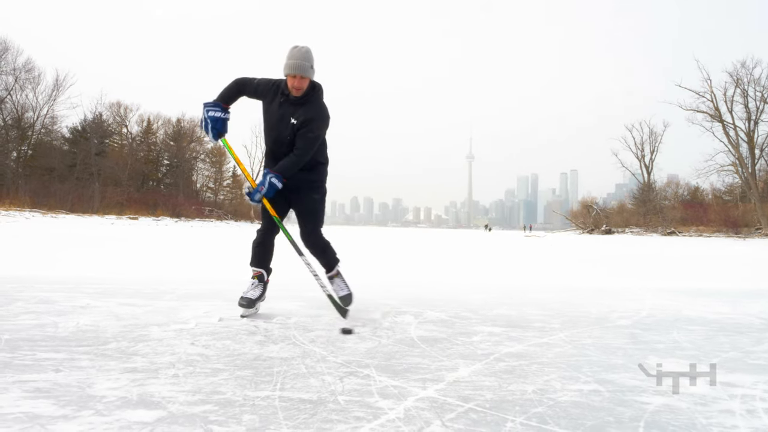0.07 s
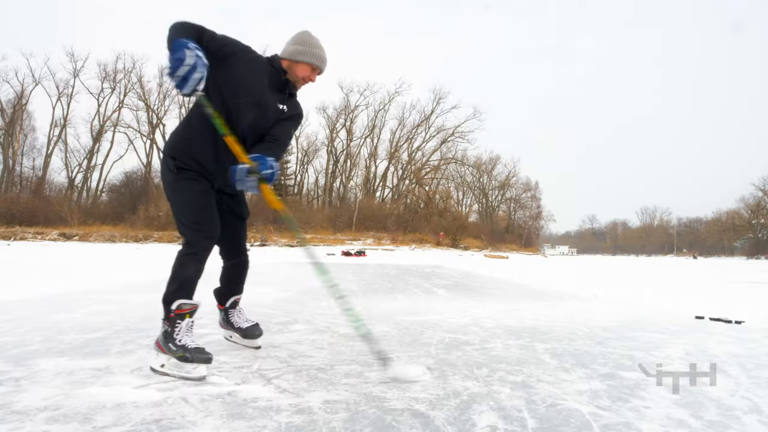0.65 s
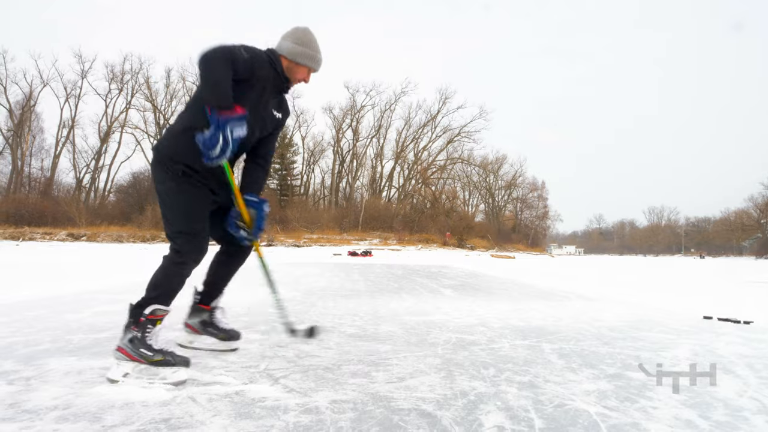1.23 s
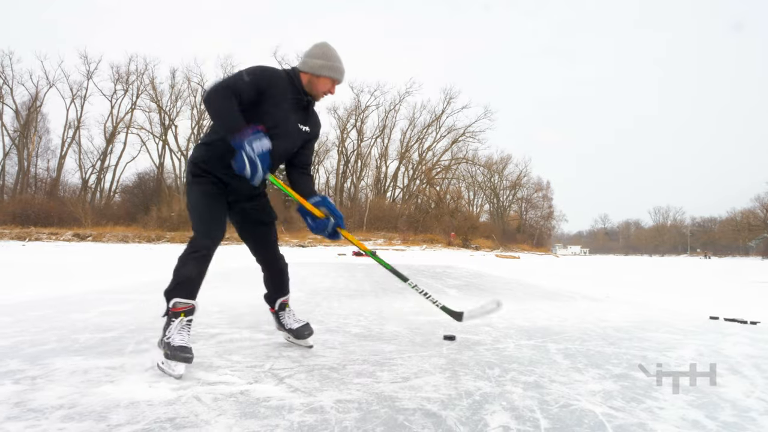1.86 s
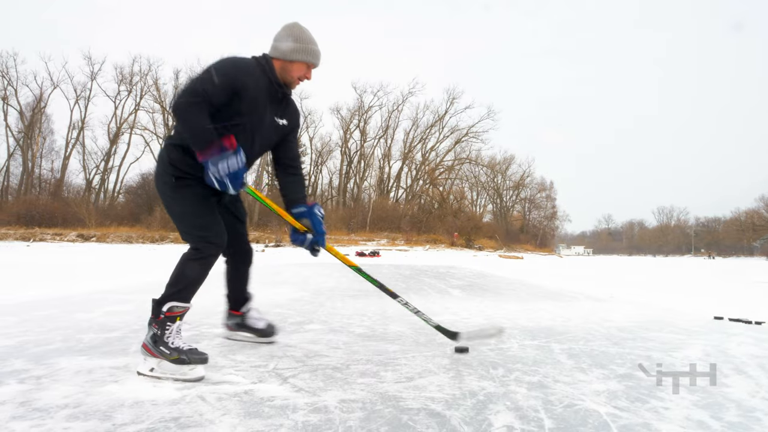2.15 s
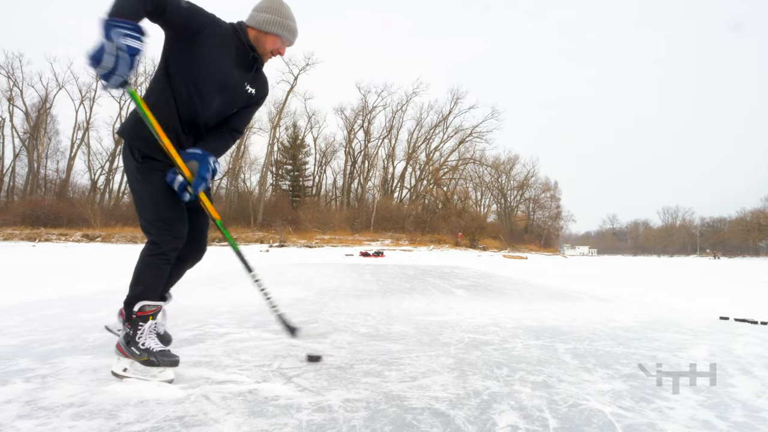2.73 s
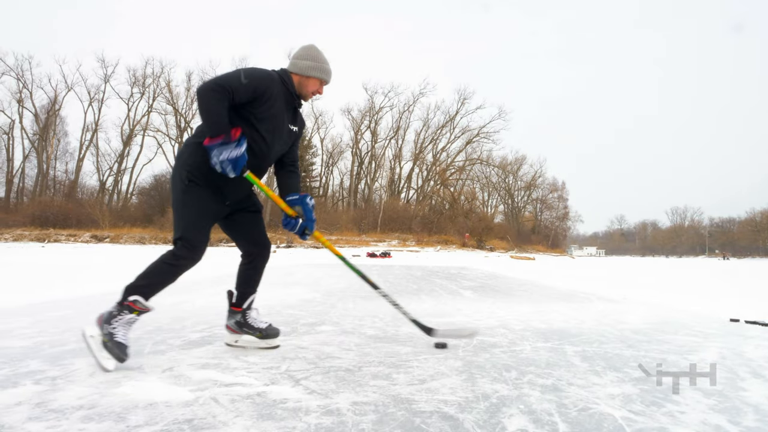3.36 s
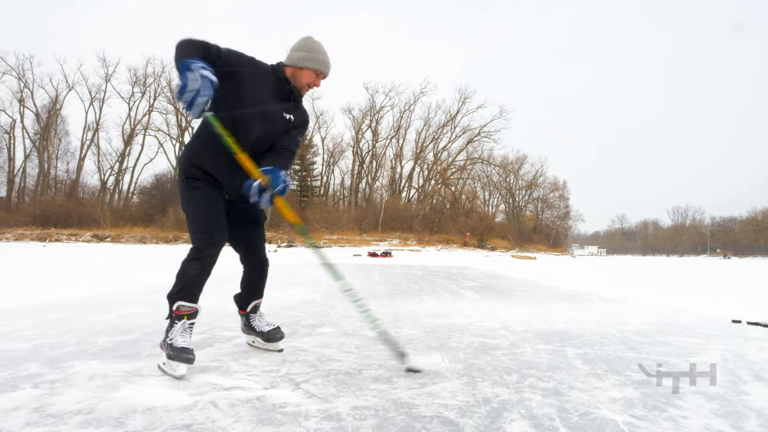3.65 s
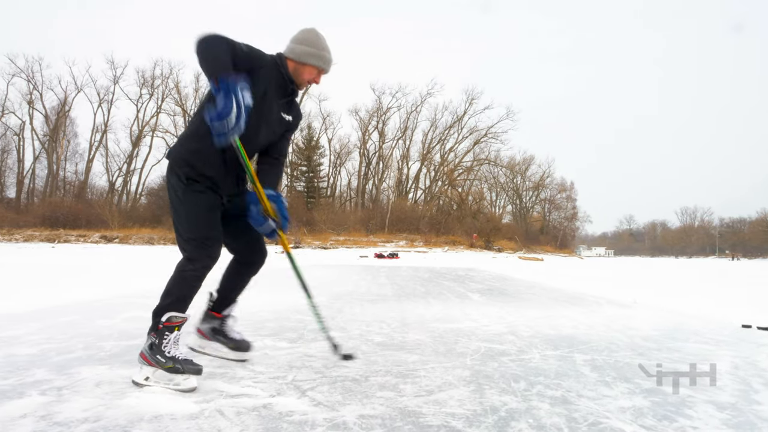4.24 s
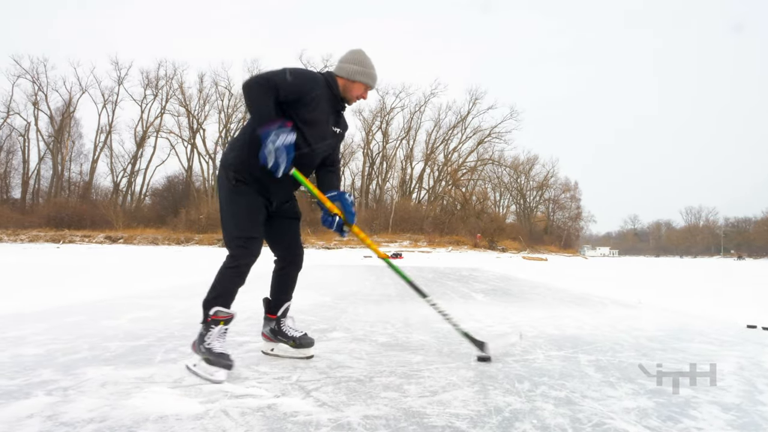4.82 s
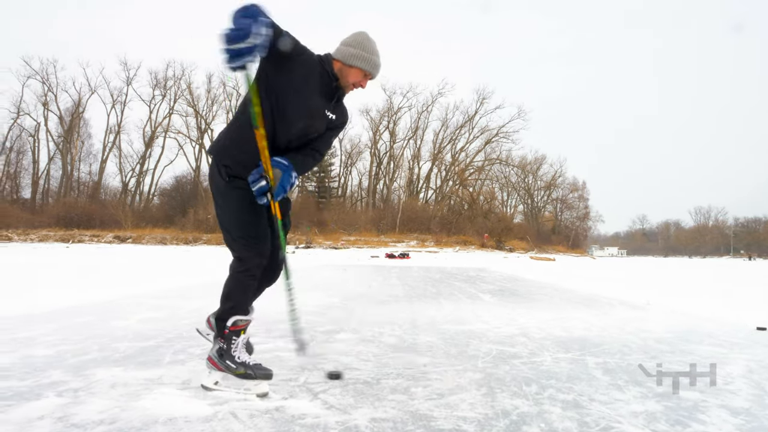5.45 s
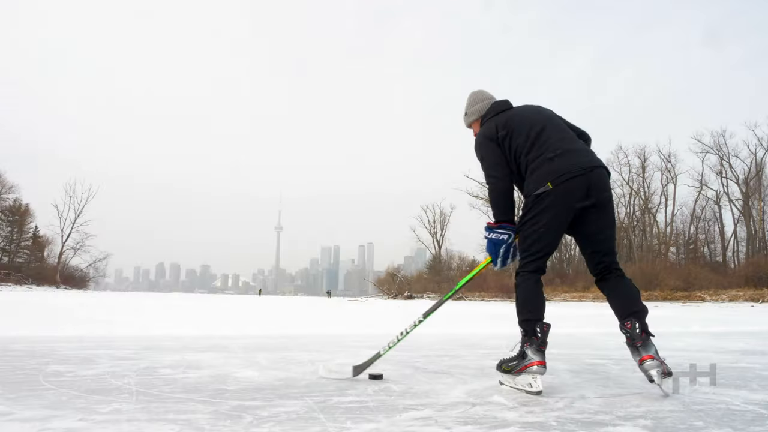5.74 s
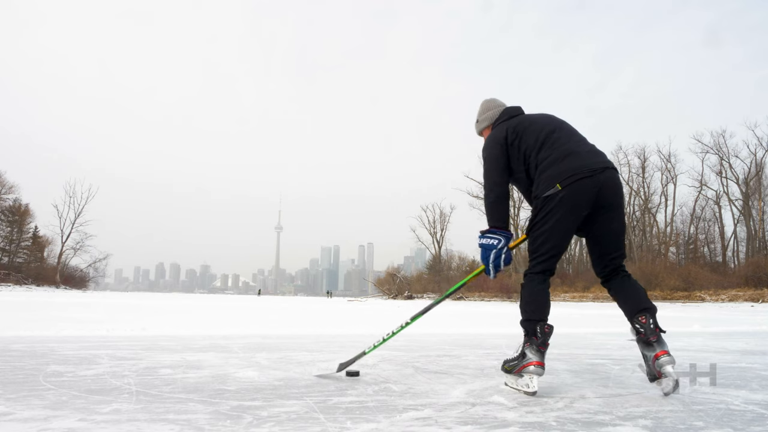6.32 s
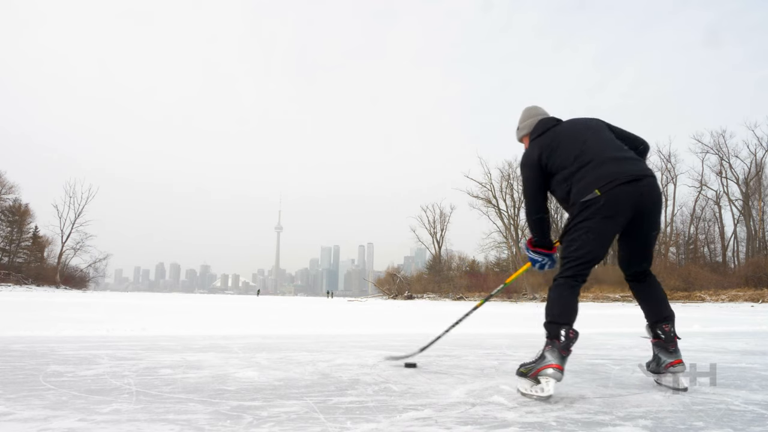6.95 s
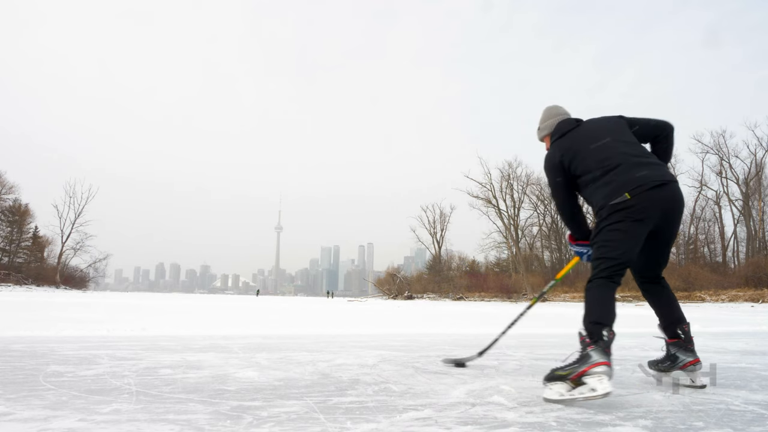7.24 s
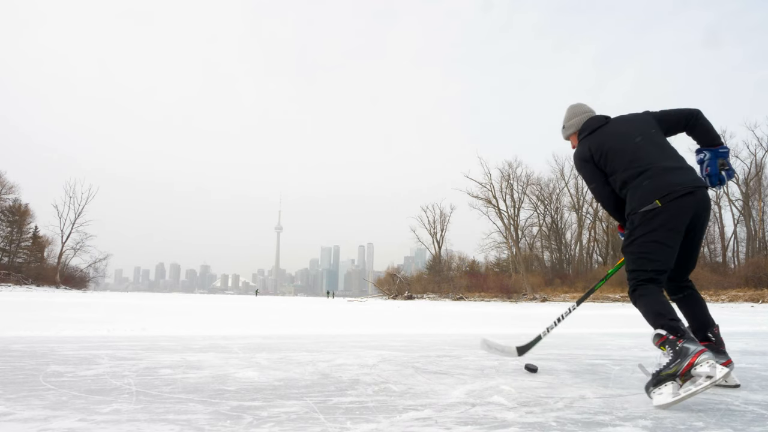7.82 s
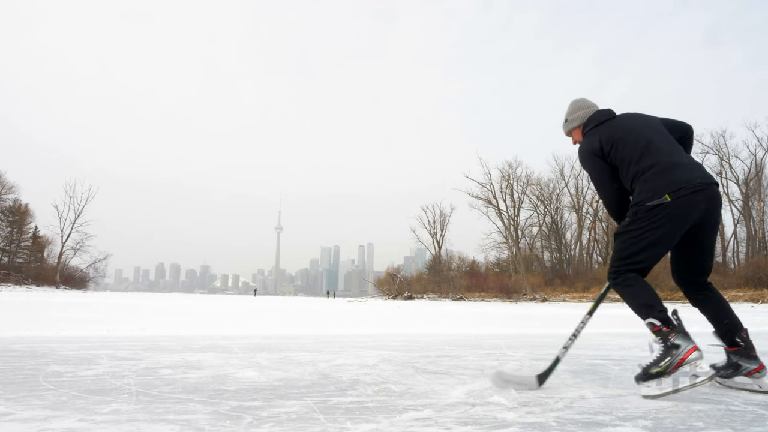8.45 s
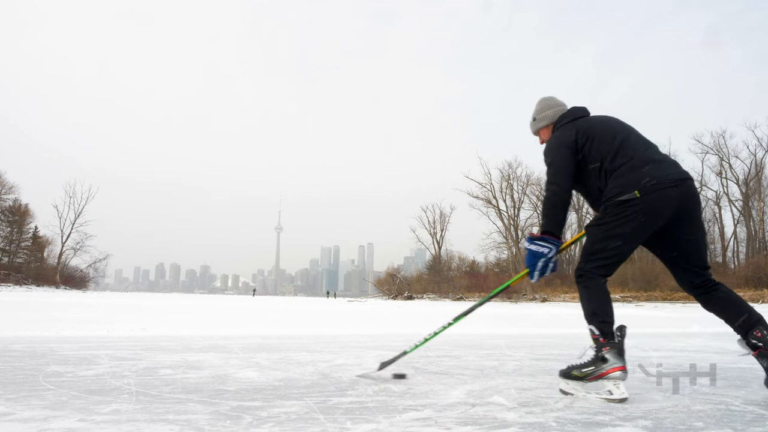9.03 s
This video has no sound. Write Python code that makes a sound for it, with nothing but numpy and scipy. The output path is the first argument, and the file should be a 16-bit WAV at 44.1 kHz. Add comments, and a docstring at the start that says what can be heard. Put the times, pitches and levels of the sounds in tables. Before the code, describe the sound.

From the start, a hockey stick dribbles a puck on outdoor ice, very close. Its blade sweeps back and forth in gritty, hissing scrapes, broken by sharp, uneven clacks a few times a second, over the low, lumpy rumble of gliding skates. Coarse ice crackles around 1 and 4 seconds. The hardest taps slightly overload the microphone and briefly duck the level. After a last tap near 5.7 seconds, the sound falls to a faint glide and quiet open air. At about 6.4 seconds the puck drags across the ice, ending in a knock at 6.6. From 7 seconds the skates carve a slow, duller turn in swelling scrapes. Puck and blades knock, strongest around 7.1, 7.7 and 8.5 seconds, with soft low thumps from the ice sheet. A slightly more muffled scrape builds to a final knock at 9 seconds.

```python
"""On outdoor ice, very close, a skater dribbles a puck over the rumble of the skates.
Friction breaks the ice in tiny fractures, which excite the resonances of the stick's blade as it
sweeps forehand and backhand; its taps on the puck are impulses that ring the same resonances.
Later the skates carve a slow, duller turn, with knocks of puck and runners and booms of the ice sheet.
The hardest hits overload the microphone and duck its gain."""
import sys
import numpy as np
from scipy import signal
from scipy.fft import rfft, irfft
from scipy.io import wavfile
from scipy.ndimage import uniform_filter1d

SR = 44100
rng = np.random.default_rng(int(sys.argv[2]) if len(sys.argv) > 2 else 0)


def pcm_store(signal):
    """Save signal as 16-bit PCM."""
    levels = np.round(np.clip(np.atleast_2d(signal), -1, 1) * 32767)
    wavfile.write(sys.argv[1], SR, levels.astype(np.int16).T)


N = 400428
TIME = np.arange(N) / SR
FREQ_HZ = np.fft.rfftfreq(N, 1 / SR)


def amp(db):
    """Amplitude ratio of a level in decibels."""
    return 10 ** (np.asarray(db) / 20)


def unit_rms(x):
    """Normalisation to unit power."""
    return x / np.sqrt(np.mean(x ** 2) + 1e-20)


def add(mix, start_s, sound):
    """Superposition of a sound on the mix, in place."""
    part = mix[round(start_s * SR):][:len(sound)]
    part += sound[:len(part)]


def through(x, response):
    """A linear system: convolution with its impulse response."""
    return signal.oaconvolve(x, response)[:len(x)]


def band(x, low_hz, high_hz, order):
    """Causal band-pass filtering."""
    return signal.sosfilt(signal.butter(order, [low_hz, high_hz], "band", fs=SR, output="sos"), x)


def coloured(spectrum):
    """Spectral shaping of white noise, rms 1."""
    hz, db = np.transpose(spectrum)
    gain = amp(np.interp(np.log(FREQ_HZ + 1), np.log(hz), db))
    return unit_rms(irfft(rfft(rng.standard_normal(N)) * gain, N))


def wander(rate_hz):
    """Random modulation: low-passed noise, rms 1."""
    lowpass = np.exp(-(FREQ_HZ / rate_hz) ** 2)
    return unit_rms(irfft(rfft(rng.standard_normal(N)) * lowpass, N))


# Spectrum of the open air: frequency_hz, relative_db
AIR_SPECTRUM = [(20, -27.5), (80, 13), (250, -15), (1000, -4), (2500, -34), (9000, -42.5), (16000, -94)]

def open_air():
    """Ambient noise: faint, steady and mostly low."""
    return amp(-55.5) * coloured(AIR_SPECTRUM)


# Weight of the runners on the ice, heard as rumble: time_s, level_db
GLIDE_LEVEL = [(0, -40.5), (.8, -37.5), (2.95, -37.5), (3.05, -44.5), (3.13, -35.5), (3.72, -39.5),
               (3.92, -39), (4.55, -36.5), (5.55, -37), (5.8, -48.5), (6.15, -63), (6.55, -43), (7.65, -30),
               (8.29, -44), (8.9, -34.5)]
# Spectrum of that rumble: frequency_hz, relative_db
RUMBLE_SPECTRUM = [(20, -36.5), (45, -22.5), (75, -11), (130, 0), (230, 2.5), (450, -5), (900, -23.5),
                   (3000, -59.5), (16000, -96)]

def runners():
    """Roughness excitation: steel gliding over uneven ice gives a low, lumpy rumble."""
    return coloured(RUMBLE_SPECTRUM) * amp(glide_db(bumps_db=2, rate_hz=18))


def glide_db(bumps_db, rate_hz):
    """Amplitude modulation: bumps vary the level of a gliding contact."""
    return np.interp(TIME, *np.transpose(GLIDE_LEVEL)) + bumps_db * wander(rate_hz)


def responses(modes):
    """Minimum-phase impulse responses of energy 1, one for each level column of a resonance table."""
    bins_hz = np.fft.rfftfreq(4096, 1 / SR) + 1
    hz, width_hz, *levels = np.transpose(modes)[:, :, None]
    peaks = 1 / (1 + ((bins_hz ** 2 - hz ** 2) / (bins_hz * width_hz)) ** 2 / 2) ** 2
    out = []
    for db in levels:
        log_gain = np.log((amp(db) ** 2 * peaks).sum(0) + 1e-10) / 2
        mirrored = np.r_[log_gain, log_gain[-2:0:-1]]
        spectrum = np.exp(np.conj(signal.hilbert(mirrored)))
        response = np.fft.ifft(spectrum).real[:len(bins_hz)]
        out.append(response / np.linalg.norm(response))
    return out


def crumbling(grains_per_s, spread_db, chatter_db, chatter_hz, powder, patchy_db):
    """Brittle fracture: an edge's force is cracks in five octaves plus powder, clumped by chatter."""
    octave = np.clip(np.log2((FREQ_HZ + 1) / 600), 0, 4)
    spectrum = 0
    for k in range(5):
        sizes = amp(spread_db * np.minimum(rng.exponential(1, N), 4)) * rng.choice([-1, 1], N)
        cracks = unit_rms(sizes * (rng.random(N) < grains_per_s / SR))
        cracks *= amp(patchy_db * wander(rate_hz=18))
        spectrum = spectrum + rfft(cracks) * np.sqrt(np.maximum(1 - abs(octave - k), 0))
    force = irfft(spectrum, N) + powder * rng.standard_normal(N)
    chatter = amp(chatter_db * 2 * np.tanh(wander(chatter_hz) / 2))
    return unit_rms(force * chatter)


def chips(per_s, low_hz, high_hz, crunch_s):
    """Shot noise: flakes of ice give way at random, each a soft cluster of crackle; rms 1."""
    sizes = amp(3.5 * np.minimum(rng.exponential(1, N), 2)) * (rng.random(N) < per_s / SR)
    pole = np.exp(-1 / (crunch_s * SR))
    clusters = signal.lfilter([1], [1, -2 * pole, pole ** 2], sizes)
    return unit_rms(band(clusters * rng.standard_normal(N), low_hz, high_hz, order=3))


def strokes(rows, bite_s, release_s, swell_db, ease_db, swell_curve, ease_curve, rest_db):
    """Incoherent sources add in power: body and hiss gains of strokes over a light, skipping contact."""
    power = amp(glide_db(bumps_db=6, rate_hz=26) + np.array(rest_db)[:, None]) ** 2
    for start, swell_s, ease_s, body_db, hiss_db, *_ in rows:
        length_s = swell_s + ease_s + release_s
        during = (TIME > start) & (TIME < start + length_s)
        t = TIME[during] - start
        pressure_db = swell_db * np.clip(1 - t / swell_s, 0, 1) ** swell_curve
        pressure_db += ease_db * np.clip((t - swell_s) / ease_s, 0, 1) ** ease_curve
        contact = np.clip(np.minimum(t / bite_s, (length_s - t) / release_s), 0, 1)
        power[:, during] += (amp([[body_db], [hiss_db]]) * amp(pressure_db) * contact) ** 2
    return np.sqrt(power)


def held(rows, column):
    """Sample and hold: each stroke sets a share until the next begins."""
    rows = np.array(rows)
    latest = np.maximum(np.searchsorted(rows[:, 0], TIME) - 1, 0)
    return np.clip(uniform_filter1d(rows[latest, column], size=600), 0, 1)


def fade_in(start_s):
    """A linear ramp from 0 to 1 in 41 ms."""
    return np.clip((TIME - start_s) / 0.041, 0, 1)


def scrape(force, bodies, shares, body_gain, hiss_gain, split_hz):
    """Forced vibration: friction drives each body; a sharper bite adds hiss above split_hz."""
    lowpass = 1 / (1 + (FREQ_HZ / split_hz) ** 8)
    out = np.zeros(N)
    for body, share in zip(bodies, shares):
        spectrum = rfft(through(np.roll(force, rng.integers(N)), body))  # each contact meets other ice
        low = unit_rms(irfft(spectrum * lowpass, N))
        high = unit_rms(irfft(spectrum * (1 - lowpass), N))
        out += np.sqrt(share) * (body_gain * low + hiss_gain * high)
    return out


# Resonances lifted or damped in a scrape: start_s, end_s, pitch_hz, lift_db
PRESSED_MODES = [(0, 0.212, 3370, 12), (0, 0.158, 5600, 5), (0, 0.21, 590, 7), (0.34, 0.608, 2100, 9),
                 (0.357, 0.583, 4560, 7), (.37, 0.603, 3540, -6), (0.89, 1.003, 3930, 13.5),
                 (.89, 0.98, 6360, 7.5), (0.984, 1.198, 2600, 6), (1.533, 1.74, 4430, 7.5),
                 (1.52, 1.833, 2010, 7), (1.448, 1.79, 3270, 4), (2.357, 2.986, 1220, 7),
                 (2.36, 2.97, 890, 5), (2.36, 2.898, 3000, -14), (3.35, 3.48, 3130, 7.5),
                 (3.34, 3.58, 4400, 9.5), (3.463, 3.69, 2030, 8), (3.35, 3.627, 6600, 4.5),
                 (3.93, 4.093, 1700, 8.5), (4.51, 4.977, 420, 10), (4.66, 4.946, 5140, 3),
                 (4.648, 4.997, 3330, -11), (5.336, 5.628, 3100, -5), (5.345, 5.62, 3750, 1.5),
                 (6.39, 6.624, 1750, 8.5), (7.333, 7.524, 1870, 11), (7.45, 7.742, 4320, 8),
                 (7.49, 8.36, 745, 5), (8.31, 8.355, 2620, 12), (8.38, 8.417, 1450, 5.5)]

def sing(x, width_hz, width_share, fade_s):
    """Resonance: steady pressure lifts or damps a narrow band, which drifts as the contact moves."""
    out = x.copy()
    drift = 1 + 0.015 * wander(rate_hz=5.9)
    for start, end, hz, lift_db in PRESSED_MODES:
        during = (TIME > start) & (TIME < end)
        pressed = np.clip(np.minimum(TIME[during] - start, end - TIME[during]) / fade_s, 0, 1)
        carrier = np.exp(2j * np.pi * np.cumsum(hz * drift[during]) / SR)
        pole = np.exp(-np.pi * (width_hz + width_share * hz) / SR)
        resonance = 2 * (carrier * signal.lfilter([1 - pole], [1, -pole], x[during] / carrier)).real
        out[during] += (amp(lift_db) - 1) * pressed * resonance
    return out


def flexing(x, count, shortest_s, longest_s, depth, slide):
    """Comb filtering: echoes between a blade's edges shift in strength and delay as it bends."""
    out = x.copy()
    knots_s = np.arange(0, TIME[-1] + .5, .2)
    stretch = 1 + slide * wander(rate_hz=2.13)
    for delay_s in np.geomspace(shortest_s, longest_s, count) * rng.uniform(0.926, 1.1, count):
        strength = depth * np.interp(TIME, knots_s, rng.standard_normal(len(knots_s)))
        out += strength * np.interp(TIME - delay_s * stretch, TIME, x)
    return out


def hits(rows, bodies, shares, fall_s, hardness, rise_s, rattle_s, tail_db, tail_s, shudder_s):
    """Impact: a bending wave whose pitch halves in fall_s, a shudder, and a rattle that rings the body."""
    t = np.arange(4000) / SR
    out = np.zeros(N)
    for start, blow_db, hz, swell_s, ring_db in rows:
        swell = t / swell_s * np.exp(1 - t / swell_s)
        blow = swell * np.sin(2 * np.pi * hz * fall_s * np.log(1 + t / fall_s))
        shudder = through(rng.standard_normal(len(t)) * t * np.exp(-t / shudder_s), blow)
        blow += amp(-5) * shudder * np.linalg.norm(blow) / np.linalg.norm(shudder)
        decay = np.exp(-t / rattle_s) + amp(tail_db) * np.exp(-t / tail_s)
        rattle = rng.standard_normal(len(t)) * (1 - np.exp(-t / rise_s)) * decay
        rattle = signal.lfilter([1, -hardness], [1], rattle)  # hard contact favours the high modes
        struck = sum(share[round(start * SR)] * body for body, share in zip(bodies, shares))
        ring = through(rattle, struck)
        ring *= np.sqrt(SR * rattle_s / 2) / np.linalg.norm(ring)
        add(out, start, amp(blow_db) * blow + amp(ring_db) * ring)
    return out


def ping(rows, modes, cycles, scatter_db, octave_db):
    """Free vibration: narrow modes ring on after a hit, favouring those near its pitch."""
    t = np.arange(SR // 5) / SR
    hz, db = np.transpose(modes)[:, :, None]
    decay = np.exp(-hz * t / cycles) * (1 - np.exp(-hz * t))
    out = np.zeros(N)
    for start, _, pitch_hz, _, ring_db in rows:
        strength, phase = rng.uniform(-1, 1, (2, len(modes), 1))  # each hit lands elsewhere
        gain = amp(ring_db + db + scatter_db * strength + octave_db * abs(np.log2(hz / pitch_hz)))
        add(out, start, (gain * decay * np.sin(2 * np.pi * hz * t + np.pi * phase)).sum(0))
    return out


# Spectrum of the grumbling ice sheet: frequency_hz, relative_db
SHEET_SPECTRUM = [(45, -13), (80, 0), (220, -11), (16000, -110)]

def carved_ice(force, hiss_gain):
    """Fracture noise: shaved snow sprays and flakes tick over the grumbling sheet."""
    spray = amp(-25) * hiss_gain * unit_rms(band(force, 4400, 5730, order=2))
    ticks = amp(-57) * chips(per_s=70, low_hz=500, high_hz=4200, crunch_s=.0018)
    return spray + ticks + amp(-45) * coloured(SHEET_SPECTRUM)


# Knocks of puck and runners in the turn: start_s, blow_db, pitch_hz, ring_db, boom_db
TURN_KNOCKS = [(6.6153,1.5,356,-4,-26), (6.92,-12.5,477,-18,-24.5), (6.942,-17,423,-16,-29),
               (6.97,-18,453,-16,-21), (7.0415,-8.5,388,-8.5,-14.5), (7.0817,-9,410,-8.5,-17),
               (7.1345,1,1500,-3.5,-20), (7.139,-0.5,666,-9,-30), (7.494,-8,400,-7.5,-26),
               (7.7174,6,1140,7,-14.5), (7.7305,3.5,650,-28,-41), (8.3937,-16.5,316,-22,-37),
               (8.4999,5,452,7,-23), (8.5126,0.5,450,-24,-41), (8.5293,-5.5,406,-28,-31),
               (8.7897,-14,630,-15,-30), (9.002,1.5,1240,-26,-32)]

def knocks(bodies, shares):
    """Impulse excitation: puck and runners knock and ring briefly."""
    swell_cycles = 0.39
    blows = [(start, blow_db, hz, swell_cycles / hz, ring_db)
             for start, blow_db, hz, ring_db, _ in TURN_KNOCKS]
    impacts = hits(blows, bodies, shares, fall_s=0.062, hardness=0.76, rise_s=0.00041,
                   rattle_s=0.00087, tail_db=-28.5, tail_s=0.0047, shudder_s=0.003)
    return impacts + ping(blows, [(1420, -15)], cycles=14.4, scatter_db=6, octave_db=-4.5)


def booms(start_hz, end_hz, fall_s, swell_s):
    """Dispersion: high bending waves in the ice arrive first, so each knock trails a falling thump."""
    t = np.arange(SR // 8) / SR
    swell = (t / swell_s * np.exp(1 - t / swell_s)) ** 2
    out = np.zeros(N)
    for start, *_, boom_db in TURN_KNOCKS:
        hz = rng.uniform(0.77, 1.17) * (end_hz + (start_hz - end_hz) * np.exp(-t / fall_s))
        add(out, start, amp(boom_db) * swell * np.sin(2 * np.pi * np.cumsum(hz) / SR))
    return out


def turning_away(x, start_s, above_hz, treble_db):
    """High-shelf attenuation: the treble drops as the skater glides off and turns away."""
    highpass = 1 - 1 / (1 + (FREQ_HZ / above_hz) ** 4)
    treble = irfft(rfft(x) * highpass, N)
    return x + (amp(treble_db) - 1) * fade_in(start_s) * treble


TURN_START_S = 5.72
# Resonances of flat runner, leaning edge and dragged puck: pitch_hz, width_hz, flat_db, edge_db, drag_db
SLIDE_MODES = [(226, 166, 4, -22, -11), (376, 89, 5.5, -5, -12), (588, 147, 7.5, -12.5, -11),
               (785, 200, 1.5, -6.5, -3), (1238, 330, -11, -8.5, 1), (1650, 260, -11.5, -34, 3.5),
               (2106, 400, -12, -14, -4), (2600, 430, -19.5, -15, -11), (3540, 640, -23.5, -20, -23),
               (4520, 1000, -32, -32.5, -42), (7290, 440, -57, -65, -58)]
# Slides in the turn: start_s, swell_s, ease_s, body_db, hiss_db, edge_share, drag_share
TURN_SLIDES = [(5.72, 0.058, 0.42, -47, -45, 0, 0.14), (6.19, 0.27, 0.033, -41, -38.5, 0.02, 0),
               (6.395, 0.055, 0.069, -36.5, -34.5, 0, 0), (6.44, 0.18, 0.0081, -22, -27, 0.01, 0.97),
               (6.635, 0.075, 0.23, -35.5, -43, 0, 0.3), (6.92, 0.36, 0.39, -25, -30, 0.03, 0),
               (7.3, 0.41, 0.18, -22.5, -24.5, 0.11, 0.09), (7.73, 0.16, 0.33, -22.5, -25.5, 0.74, 0.04),
               (8.225, 0.02, 0.02, -28, -31, 0.7, 0.3), (8.318, 0.018, 0.011, -25, -34, 0.86, 0),
               (8.383, 0.011, 0.082, -31, -35.5, 0.02, 0.98), (8.43, 0.079, 0.099, -27.5, -34, 0.13, 0.19),
               (8.63, 0.086, 0.041, -28.5, -35, 0, 0.2), (8.77, 0.27, .17, -21, -25.5, 0.08, 0.1)]

def turn():
    """Sliding friction: the puck is dragged in, then the skates lean on to their edges and carve."""
    edge, drag = held(TURN_SLIDES, column=5), held(TURN_SLIDES, column=6)
    flat = np.clip(1 - edge - drag, 0, 1)
    bodies, shares = responses(SLIDE_MODES), [flat, edge, drag]
    body_gain, hiss_gain = fade_in(TURN_START_S) * strokes(
        TURN_SLIDES, bite_s=0.0036, release_s=0.0096, swell_db=-23, ease_db=-9,
        swell_curve=2.6, ease_curve=1, rest_db=(-16.5, -14))
    force = crumbling(grains_per_s=2800, spread_db=3, chatter_db=3, chatter_hz=124,
                      powder=0.48, patchy_db=1)
    sliding = scrape(force, bodies, shares, body_gain, hiss_gain, split_hz=926)
    sliding = sing(sliding, width_hz=180, width_share=0.066, fade_s=0.016)
    sliding = flexing(sliding, count=6, shortest_s=.002, longest_s=.007, depth=.12, slide=.03)
    impacts = knocks(bodies, shares) + booms(start_hz=437, end_hz=72.5, fall_s=0.0077, swell_s=0.0084)
    sliding += fade_in(TURN_START_S) * carved_ice(force, hiss_gain)
    sliding = turning_away(sliding, start_s=8.36, above_hz=3100, treble_db=-7)
    return band(sliding + impacts, 32, 9300, order=14)


# Gritty patches of ice: start_s, end_s, level_db
GRIT_PATCHES = [(.98, 1.17, -27), (1.26, 1.4, -34), (3.97, 4.18, -31), (4.19, 4.42, -39)]

def grit(blade):
    """Random impulse excitation: coarse grains crack one by one and ring the blade."""
    grains = unit_rms(through(chips(per_s=95, low_hz=700, high_hz=12000, crunch_s=.0004), blade))
    return grains * sum(amp(db) * (TIME > start) * (TIME < end) for start, end, db in GRIT_PATCHES)


# Modes of the blade that ring on after a tap: pitch_hz, level_db
CLACK_MODES = [(430, -20.5), (790, -12.5), (1210, -13), (1630, -12), (1960, -8), (3300, -8.5), (4600, -8.5)]
# Strikes of the blade on puck or ice: start_s, blow_db, pitch_hz, swell_s, ring_db
BLADE_TAPS = [(0.182,-0.5,1680,0.00021,-13), (.283,-8,1820,0.00042,-4), (0.3299,-4.5,2030,0.00045,-13),
              (0.5709,-6,2540,0.00032,-13), (0.702,-19,2600,0.00026,-20), (0.8326,2,1180,0.00024,-14),
              (1.1559,0,1560,0.0002,-7), (1.174,-12,2690,0.00019,-8.5), (1.2302,0,1630,0.00049,-5),
              (1.269,-3.5,1770,0.00031,-16), (1.368,-7.5,1020,0.00046,-15), (1.9765,-14,724,0.00079,-14.5),
              (2.067,-20,3080,0.0012,0), (2.118,2,1620,0.00024,-15), (2.1337,-8,2150,.0003,-30),
              (2.3372,0,5560,0.00036,-2), (2.3724,-3.5,1000,0.00042,-17), (2.5736,-0.5,1350,0.00039,-7),
              (2.6514,2,1140,0.00055,-6), (2.8999,-31,1420,0.00027,-7), (2.9708,-1,3130,0.00057,-4.5),
              (2.9718,-1.5,1540,0.00092,-5), (2.9846,-10,1490,.0008,-19), (3.1307,-11,1090,0.00053,-17),
              (3.3204,-3.5,1900,0.00089,-8), (3.5592,-2.5,2100,0.00045,-13), (3.75,-19,950,0.00055,-28.5),
              (3.8096,2.5,1460,0.00029,-9.5), (3.8608,5.5,1160,0.0005,-5.5), (4.121,-3.5,1550,0.00056,-12),
              (4.1913,-1.5,3600,0.00055,-3.5), (4.3348,-20,900,.0007,-15), (4.4225,-4,1540,0.00038,-30),
              (4.4407,-9,1410,0.00041,-23), (4.7369,-1,2670,0.00065,-1.5), (4.9955,-1.5,1100,0.00025,-15),
              (5.121,-14.5,800,0.00063,-23.5), (5.2173,0.5,1460,0.00044,-20), (5.2741,3,1020,0.00039,-15),
              (5.6618,-1.5,3210,0.0014,-2.5)]

def taps(blade, shares):
    """Impact and reflection: each tap rings the blade, runs up the shaft and returns twice."""
    blows = hits(BLADE_TAPS, blade, shares, fall_s=0.00294, hardness=0.037, rise_s=0.00048,
                 rattle_s=0.002, tail_db=-22, tail_s=0.0042, shudder_s=0.0011)
    blows += ping(BLADE_TAPS, CLACK_MODES, cycles=7, scatter_db=3, octave_db=-3)
    # the light blade radiates little bass
    blows = signal.sosfilt(signal.butter(2, 270, "high", fs=SR, output="sos"), blows)
    round_trip_s = .0073
    first_echo = amp(-18) * np.interp(TIME - round_trip_s, TIME, blows)
    second_echo = amp(-26) * np.interp(TIME - 2 * round_trip_s, TIME, blows)
    return blows + first_echo + second_echo


# Resonances of the stick's blade: pitch_hz, width_hz, forehand_db, backhand_db
BLADE_MODES = [(530, 344, 4, 0), (620, 110, -3.5, -6), (828, 156, 4.5, -2), (1170, 290, -28, -4),
               (1250, 560, 3, -2), (1680, 540, -11.5, -2.5), (1858, 150, -1, -1.5), (2180, 560, 1, -13),
               (2550, 340, -3.5, -10), (3080, 560, -3, -33), (3520, 200, -3, -13.5),
               (3890, 830, -9.5, -10.5), (4170, 300, -8, -24), (5170, 1260, -8, -16.5),
               (5850, 1180, -22, -16.5), (6570, 700, -12.5, -21.5), (8970, 2300, -21.5, -28.5),
               (11600, 3300, -27.5, -30.5)]
# Sweeps of the blade over the ice: start_s, swell_s, ease_s, body_db, hiss_db, backhand_share
BLADE_SWEEPS = [(-.03, 0.011, 0.24, -23.5, -28, 0.98), (.21, 0.098, 0.057, -30.5, -31, 0.2),
                (.355, 0.15, 0.15, -29, -28.5, 0.42), (.62, 0.12, 0.049, -34.5, -40, 0.03),
                (.735, 0.021, 0.12, -21.5, -31, 0.62), (.87, 0.15, 0.23, -21, -30, 0.83),
                (1.25, 0.059, 0.071, -25, -36, 0.05), (1.37, 0.15, 0.092, -25, -28, 0.3),
                (1.54, 0.036, 0.32, -23, -24, 0.04), (1.925, 0.011, 0.099, -31, -35.5, 0.04),
                (2.06, 0.14, 0.0079, -24.5, -33, 0.8), (2.22, 0.19, 0.069, -29, -34.5, 0),
                (2.36, 0.2, 0.22, -28, -30.5, 1), (2.66, 0.1, 0.3, -35, -38.5, 0.97),
                (3.095, 0.11, 0.21, -28.5, -34.5, 0.3), (3.28, 0.11, 0.32, -30.5, -29.5, 0.12),
                (3.775, 0.091, 0.37, -28.5, -36.5, 0.77), (3.945, 0.025, 0.15, -23.5, -25.5, 0.97),
                (4.395, 0.165, 0.1, -30, -34, 0.03), (4.66, 0.06, 0.026, -27, -23, 0.18),
                (4.72, 0.12, 0.13, -32.5, -27, 0.47), (5.21, 0.11, 0.79, -26.5, -35.5, 0.4),
                (5.335, 0.043, 0.29, -23, -29, 0.8), (5.65, 0.049, 0.027, -47.5, -51, 0)]

def stick():
    """Source and filter: scraping and taps drive the blade, whose colour differs on each face."""
    backhand = held(BLADE_SWEEPS, column=5)
    blade, shares = responses(BLADE_MODES), [1 - backhand, backhand]
    body_gain, hiss_gain = (1 - fade_in(TURN_START_S)) * strokes(
        BLADE_SWEEPS, bite_s=0.01, release_s=0.069, swell_db=-7.5, ease_db=-12,
        swell_curve=1.8, ease_curve=1.75, rest_db=(-20, -16))
    hiss_gain *= amp(1.4 * wander(rate_hz=40))  # the spray comes off in spurts
    force = crumbling(grains_per_s=1900, spread_db=3.5, chatter_db=2.5, chatter_hz=110,
                      powder=0.42, patchy_db=1.5)
    scraping = scrape(force, blade, shares, body_gain, hiss_gain, split_hz=2050)
    scraping = sing(scraping, width_hz=99, width_share=0.049, fade_s=0.0094)
    scraping = flexing(scraping, count=7, shortest_s=.0007, longest_s=.0042, depth=.17, slide=.04)
    tapping = taps(blade, shares)
    flake_gain = amp(-32.5) * np.sqrt(body_gain)  # flakes snap off even under a light touch
    flakes = flake_gain * chips(per_s=34, low_hz=1400, high_hz=7750, crunch_s=0.00059)
    return scraping + tapping + flakes + grit(blade[1])


def scene():
    """Superposition of all sources in one channel."""
    return (stick() + turn() + runners() + open_air())[None]


def gain_control(x, threshold_db, ratio, attack_s, recovery_db_per_s):
    """Compression: too slow to catch a hit, the gain drops just after it and creeps back."""
    level_db = 10 * np.log10(abs(uniform_filter1d(x[0] ** 2, size=100)) + 1e-12)
    over_db = np.maximum(level_db - threshold_db, 0) * (1 - 1 / ratio)
    recovered_db = TIME * recovery_db_per_s
    cut_db = np.maximum.accumulate(over_db + recovered_db) - recovered_db
    lag = np.exp(-1 / (attack_s * SR))
    return x * amp(-signal.lfilter([1 - lag], [1, -lag], cut_db))


def record(dry):
    """Overload in a band-limited microphone: hard hits duck the gain and saturate at full scale."""
    bass_hz, top_hz = 50, 16100
    thinned = signal.sosfilt(signal.butter(3, bass_hz, "high", fs=SR, output="sos"), dry)
    ducked = gain_control(thinned, threshold_db=-11, ratio=3.62, attack_s=0.005, recovery_db_per_s=30)
    clipped = ducked / (1 + ducked ** 8) ** (1 / 8)
    lowpass = signal.firwin(401, top_hz, window=("kaiser", 9), fs=SR)
    return signal.oaconvolve(clipped, lowpass[None], "same")


dry = scene()
out = record(dry)
pcm_store(out)
```